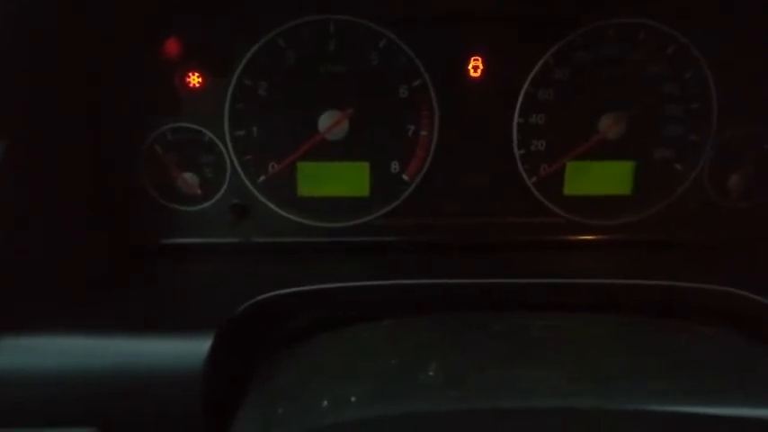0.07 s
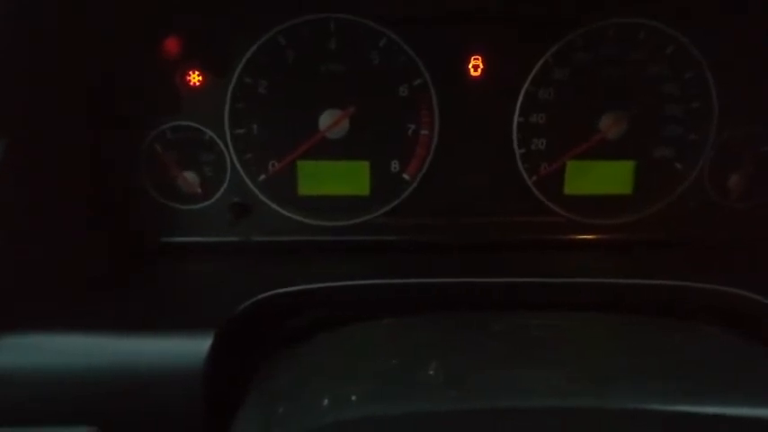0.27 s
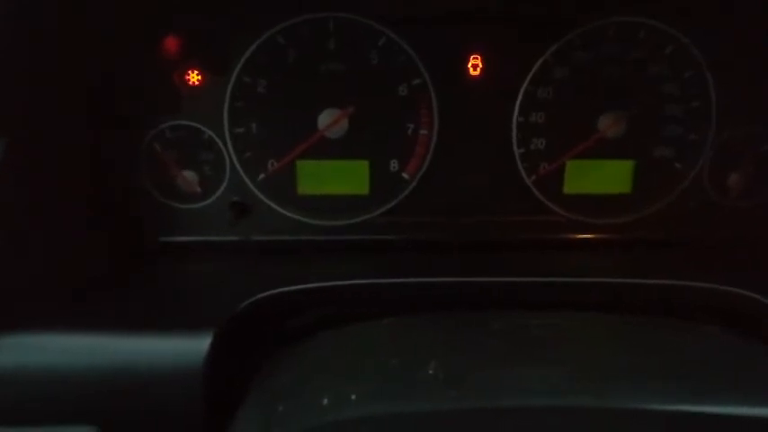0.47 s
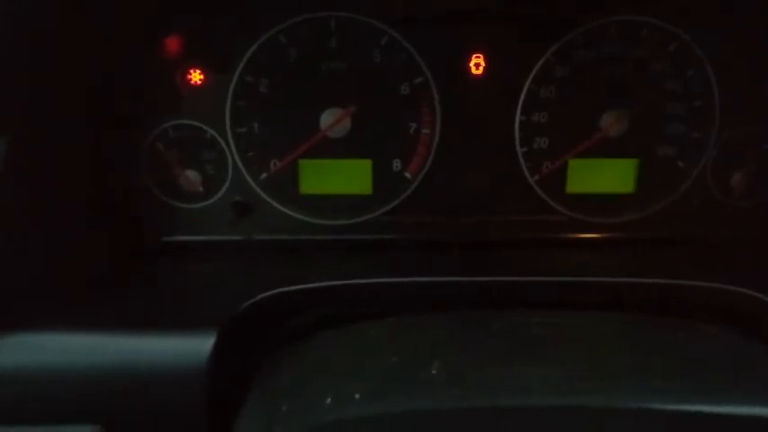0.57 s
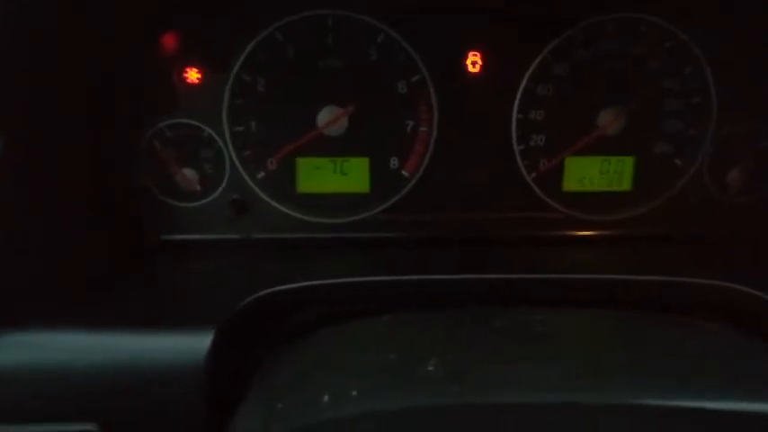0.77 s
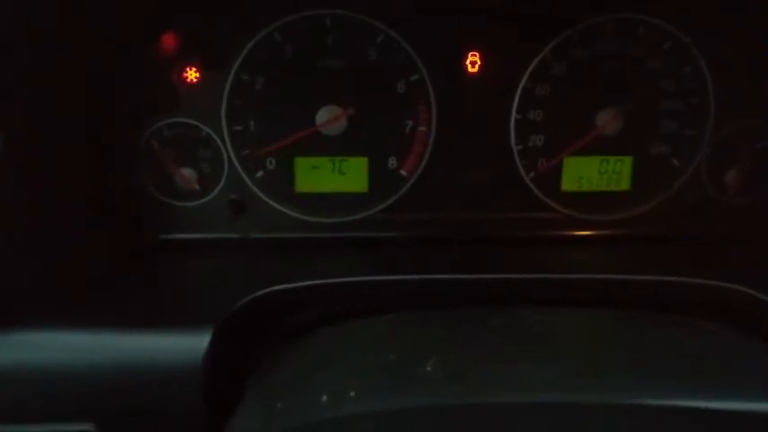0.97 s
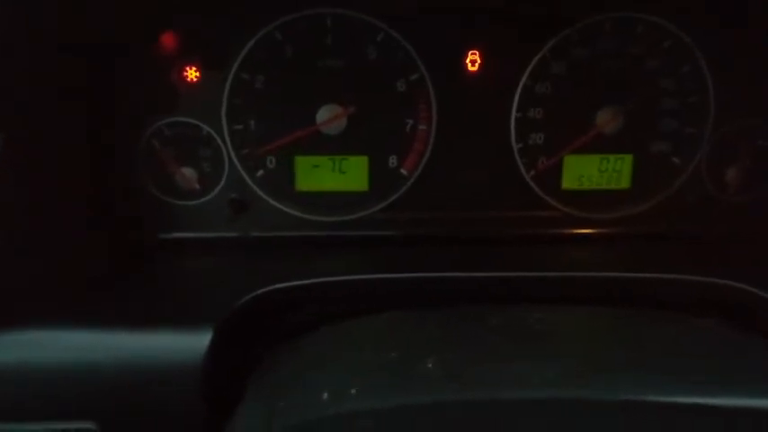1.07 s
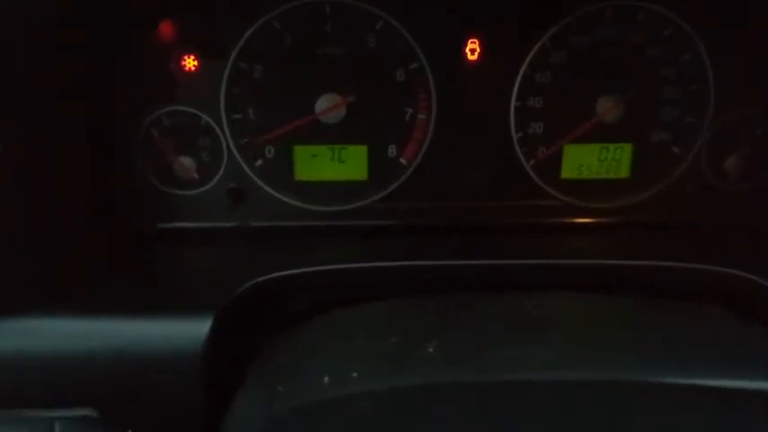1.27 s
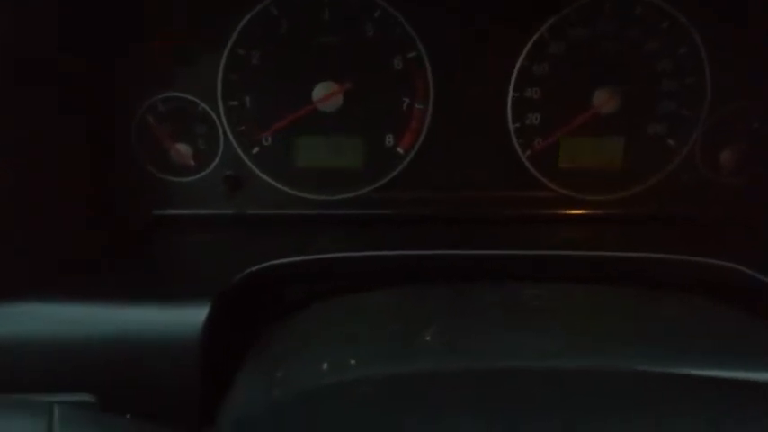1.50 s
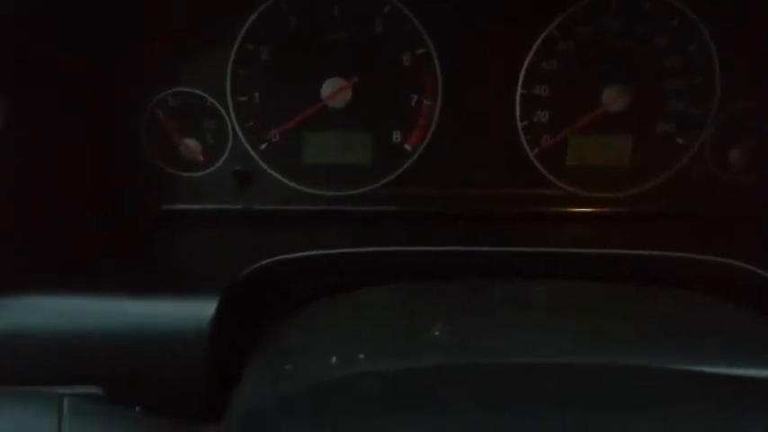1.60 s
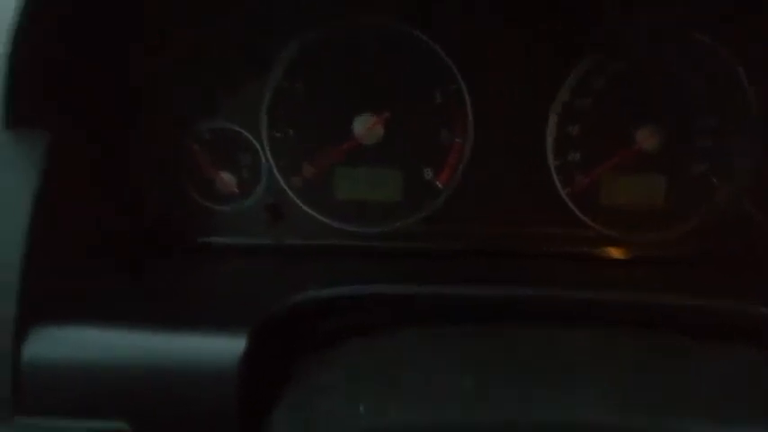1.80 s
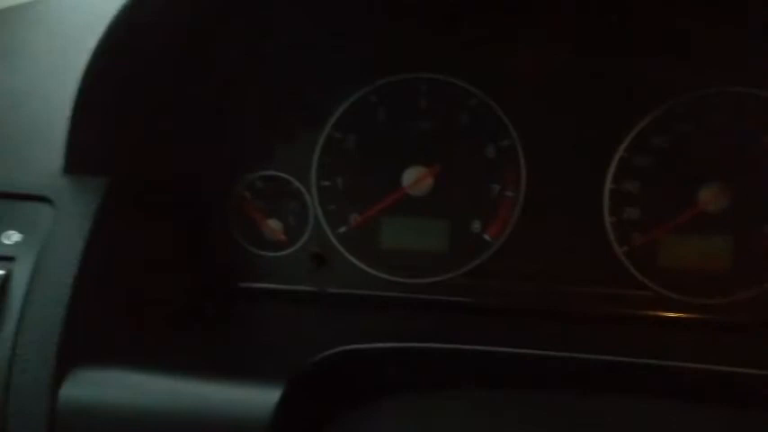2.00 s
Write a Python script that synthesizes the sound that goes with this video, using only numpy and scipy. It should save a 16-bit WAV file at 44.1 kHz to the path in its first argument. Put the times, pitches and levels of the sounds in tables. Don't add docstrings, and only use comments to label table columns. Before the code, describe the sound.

Crisp ignition lock clicks, a short scrape of the key withdrawing, soft plastic knocks in a parked car

```python
import sys
import numpy as np
from scipy import signal
from scipy.fft import rfft, irfft, next_fast_len
from scipy.io import wavfile
from scipy.ndimage import uniform_filter1d, map_coordinates

SR = 44100
rng = np.random.default_rng(int(sys.argv[2]) if len(sys.argv) > 2 else 0)


def attenuation_scalar(level_db):
    decades = np.asarray(level_db, float) / 20
    return 10 ** decades


def output_pcm(signal):
    pcm = np.clip(np.atleast_2d(signal).T, -1, 1) * 32767
    wavfile.write(sys.argv[1], SR, np.round(pcm).astype(np.int16))


N = 90404
FREQ = np.fft.rfftfreq(next_fast_len(N + 8192), 1 / SR)


def unit(x):
    return x / np.sqrt(np.mean(x ** 2) + 1e-20)


def along(points, hz):
    f, v = np.transpose(points)
    return np.interp(np.log(hz + 1), np.log(f + 1), v)


def curves(rows):
    s, *cols = np.transpose(rows)
    return [np.interp(np.arange(N) / SR, s, c) for c in cols]


def wobble(rate):
    knots = rng.standard_normal(int(N * rate / SR) + 4)
    return map_coordinates(knots, [np.arange(N) * rate / SR])


def stroke(start, end, fade):
    t = np.arange(N) / SR
    return np.clip(np.minimum(t - start, end - t) / fade + .5, 0, 1) ** 2


def even(x, seconds):
    power = np.abs(uniform_filter1d(x[0] ** 2, int(seconds * SR)))
    return unit(x / np.sqrt(power + 0.012))


def peaks(table, hz):
    power = 0
    for c, w, db in table:
        power = power + attenuation_scalar(2 * db) * (hz * w) ** 2 / ((c * c - hz * hz) ** 2 + (hz * w) ** 2)
    return np.sqrt(power)


def sides(points, hz):
    return attenuation_scalar(along(points, hz) * np.array([[.5], [-.5]]))


def causal(gain):
    c = irfft(np.log(gain + 1e-6))
    half = c.shape[-1] // 2
    c = np.concatenate([c[..., :1], 2 * c[..., 1:half], np.zeros_like(c[..., half:])], axis=-1)
    return irfft(np.exp(rfft(c)))[..., :half]


# (frequency [Hz], likeness [0-1])
LIKENESS = [(45, 1), (130, 0.98), (290, 0.66), (640, 0)]


def rush(gain, patchy_db):
    z = signal.stft(rng.standard_normal((2, N)), nperseg=512)[2]
    field = uniform_filter1d(uniform_filter1d(rng.standard_normal(z.shape[1:]), 6, 0), 8, 1)
    pair = signal.istft(z * attenuation_scalar(patchy_db * unit(field)), nperseg=512)[1][:, :N]
    turn = np.arccos(np.clip(along(LIKENESS, FREQ), -1, 1)) / 2
    mid, side = rfft(pair, 2 * len(FREQ) - 2) * [np.cos(turn), np.sin(turn)]
    return unit(irfft(np.array([mid + side, mid - side]) * gain)[:, :N])


# (frequency [Hz], time to fall 60 dB [s])
CABIN_DECAY = [(300, 0.15), (1500, 0.072), (5000, 0.052), (14000, 0.039)]


def cabin(wet_db):
    hz, t, z = signal.stft(rng.standard_normal((2, 6144)), SR, nperseg=128)
    decay = attenuation_scalar(-60 * t / along(CABIN_DECAY, hz)[:, None])
    tail = signal.istft(z * decay, SR, nperseg=128)[1]
    build_up = np.clip(np.arange(tail.shape[1]) / (0.0017 * SR), 0, 1)
    tail = attenuation_scalar(wet_db) * tail / np.linalg.norm(tail[0]) * build_up
    tail[:, 0] += 1
    return tail


def contacts(events, modes, broad, side, ring_db, wet_db, spiky_db):
    out = np.zeros((2, N + SR))
    hz, t = np.fft.rfftfreq(8192, 1 / SR), np.arange(2048) / SR
    for s, db, length, tilt_db, aside in events:
        chatter = rng.standard_normal((2, 2048)) * attenuation_scalar(spiky_db * rng.standard_normal(2048))
        chatter = chatter[0] + 0.81 * chatter[1] * np.array([[1], [-1]])
        chatter = chatter * np.exp(-(t / max(length, 3e-4)) ** 4) * (1 - np.exp(-t / 0.00099))
        ring = 1 + attenuation_scalar(ring_db) * peaks(modes, hz)
        colour = attenuation_scalar(along(broad, hz)) * ring * attenuation_scalar(tilt_db * np.log2((hz + 200) / 4000))
        hit = signal.fftconvolve(chatter, causal(colour * sides(side, hz) ** aside), axes=1)
        hit = signal.fftconvolve(hit, cabin(wet_db), axes=1)
        out[:, round(s * SR):][:, :hit.shape[1]] += attenuation_scalar(db) * hit / np.sqrt(np.sum(hit ** 2) / 40)
    return out[:, :N]


def dings(events, cycles, rough=0):
    out, t = np.zeros(N + SR), np.arange(SR // 2) / SR
    for s, db, hz in events:
        slip = uniform_filter1d(uniform_filter1d(rng.standard_normal(len(t)), 120), 120)
        slip = 1 + rough * unit(slip)
        envelope = np.exp(-t * hz / cycles) * (1 - np.exp(-t * hz / 1.06))
        out[round(s * SR):][:len(t)] += attenuation_scalar(db) * slip * np.sin(2 * np.pi * hz * t) * envelope
    return out[:N]


# (frequency [Hz], level [dB])
HISS_COLOUR = [(200, -48), (300, 20.5), (700, 9.5), (2500, 7), (6000, 7), (15600, -39)]


def hiss():
    return attenuation_scalar(-75) * rush(attenuation_scalar(along(HISS_COLOUR, FREQ)), patchy_db=4.5)


# (pitch [Hz], level [dB], start [s], end [s])
WHINE_TONES = [
    (920, -74, 0.75, 1.08),
    (870, -78.5, 0.87, 1.1),
    (498, -80, .75, 1.11),
    (14500, -80, 0.23, 0.22),
]


def whines():
    t, out = np.arange(N) / SR, 0
    for hz, db, start, end in WHINE_TONES:
        out = out + attenuation_scalar(db + 2.4 * wobble(23)) * stroke(start, end, 0.038) * np.sin(2 * np.pi * hz * t)
    return out


# (time [s], level [dB])
AIR_FLOW = [(0, -54), (.09, -53), (.125, -65), (.16, -56.5), (.38, -53.5), (.47, -60), (1.1, -74),
            (1.6, -71.5)]
# (frequency [Hz], width [Hz], level [dB])
DUCT_TONES = [(262, 83, 3.5), (822, 206, -3), (1125, 147, -1), (1617, 110, -6.5), (2390, 90, -7.5),
              (3250, 1100, -9)]


def fan():
    flow_db, = curves(AIR_FLOW)
    ducts = (peaks(DUCT_TONES, FREQ) / (1 + (FREQ / 4300) ** 4)) ** 1.5
    air = rush(ducts * attenuation_scalar([[1.5], [-1.5]]), patchy_db=1.5)
    return attenuation_scalar(flow_db + 0.16 * wobble(29)) * air


# (time [s], pitch [Hz], level [dB])
BOOM_PATH = [(.9, 58.5, -60.5), (1.03, 59.65, -44.5), (1.11, 60, -55), (1.21, 58.5, -45.5),
             (1.3, 60.2, -58), (1.37, 59.7, -41), (1.42, 61.54, -54), (1.53, 62.26, -40.5),
             (1.62, 67.1, -44.5), (1.72, 64.6, -35.5), (1.85, 65.3, -51.5), (2.01, 64.6, -43)]


def boom():
    hz, boom_db = curves(BOOM_PATH)
    phase = 2 * np.pi * np.cumsum(hz + .5 * wobble(10.5)) / SR
    return np.sqrt(2) * attenuation_scalar(boom_db) * np.sin(phase)


# (time [s], seat level [dB], hand level [dB])
MOVEMENT = [(0.0, -51, -49.5), (0.19, -46, -40), (0.22, -47.5, -41.5), (0.38, -49, -48.5),
            (0.42, -48.5, -38.5), (0.46, -43.5, -44), (0.59, -47.5, -34.5), (0.62, -39, -36),
            (0.67, -38, -39.5), (0.72, -38.5, -40.5), (0.93, -53.5, -39.5), (1.02, -57.5, -48.5),
            (1.05, -54, -40), (1.1, -60, -52), (1.28, -47, -49), (1.42, -59.5, -49), (1.79, -56, -58),
            (2.0, -63, -63)]
# (frequency [Hz], level [dB])
SEAT_COLOUR = [(50, -8.5), (80, 1), (150, 0), (230, -14.5), (500, -49.5)]
# (frequency [Hz], level [dB])
HAND_COLOUR = [(10, 2.5), (25, 12.5), (45, 6.5), (70, 7), (90, -47)]


def body():
    seat_db, hand_db = curves(MOVEMENT)
    seat = even(rush(attenuation_scalar(along(SEAT_COLOUR, FREQ)), patchy_db=-1.0), 0.0348)
    hand = even(rush(attenuation_scalar(along(HAND_COLOUR, FREQ)), patchy_db=-1.1), 0.064)
    return attenuation_scalar(seat_db + 1.2 * wobble(29.89)) * seat + attenuation_scalar(hand_db) * hand


# (time [s], level [dB])
SLEEVE_EFFORT = [(.5, -80), (.58, -65), (.66, -59), (.82, -62.5), (.86, -69), (1.0, -69.5), (1.05, -58.5),
                 (1.17, -56), (1.21, -62), (1.6, -67), (1.68, -65), (1.8, -60), (2.05, -63)]
# (frequency [Hz], level [dB])
CLOTH_COLOUR = [(3800, -24), (4700, -24), (5300, -4.5), (6500, -11.5), (9000, -10.5), (11000, -14.5),
                (13000, -16), (15600, -20)]
# (frequency [Hz], left over right [dB])
CLOTH_SIDE = [(1000, 21.5), (4000, 20), (8000, -11.5), (14000, -18)]


def sleeve():
    effort_db, = curves(SLEEVE_EFFORT)
    cloth = rush(attenuation_scalar(along(CLOTH_COLOUR, FREQ)) * sides(CLOTH_SIDE, FREQ), patchy_db=1.5)
    return attenuation_scalar(effort_db + 2.7 * wobble(29.6)) * cloth


# (time [s], level [dB], pitch [Hz])
HAND_BUMPS = [(.655, -24, 21.2), (.673, -18, 104), (.718, -41, 128), (.755, -45, 110), (.845, -33, 24),
              (1.24, -36, 237), (1.255, -30, 208), (1.263, -30.5, 297), (1.271, -36, 193),
              (1.283, -40.5, 345), (1.355, -40, 154), (1.8, -39.5, 254)]


def thumps():
    return dings(HAND_BUMPS, cycles=1.3)


# (time [s], level [dB], pitch [Hz])
TRIM_CREAKS = [(.279, -43.5, 870), (.541, -40, 1200), (.636, -43, 1660), (.712, -47, 1670),
               (.714, -56, 824), (.753, -59, 1235), (.795, -54, 1700), (.812, -61, 1710), (.896, -55, 1200),
               (1.052, -54.5, 670), (1.054, -49.5, 1170), (1.06, -51, 2250), (1.242, -41.5, 615),
               (1.278, -25, 1360), (1.357, -46.5, 647), (1.464, -34.5, 836), (1.52, -41, 556)]


def creaks():
    return dings(TRIM_CREAKS, cycles=5.1, rough=.5) * attenuation_scalar([[2.5], [-2.5]])


# (time [s], level [dB], pitch [Hz])
RING_TICKS = [
    (1.866, -31, 4800),
    (1.8856, -32, 3400),
    (1.8856, -35, 1400),
    (2.045, -39, 4240),
]


def nicks():
    return dings(RING_TICKS, cycles=1.1) * attenuation_scalar([[3.5], [-3.5]])


# (start [s], end [s], level [dB], pitch [Hz], width over pitch)
FINGER_SCUFFS = [
    (0.608, 0.786, -65.5, 472, 0.53),
    (0.253, 0.343, -63, 2960, 0.44),
    (1.066, 1.186, -64, 1200, 0.74),
    (1.365, 1.463, -58.5, 3650, 0.021),
    (1.45, 1.579, -50.5, 617, 0.42),
    (1.723, 1.929, -65, 1670, 0.7),
    (1.741, 2.197, -63.5, 5240, 0.63),
]


def scuffs():
    out = 0
    for start, end, db, hz, width in FINGER_SCUFFS:
        skin = rush(peaks([(hz, width * hz, 0)], FREQ) ** 2, patchy_db=3.5)
        out = out + attenuation_scalar(db + 0.74 * wobble(120)) * stroke(start, end, 0.065) * skin
    return out * attenuation_scalar([[2.5], [-2.5]])


# (time [s], level [dB], chatter length [s], tilt [dB per octave])
COLUMN_KNOCKS = [(1.135, -23.5, 0.0074, -1.5), (1.146, -26.5, 0.0048, -4), (1.166, -32, 0.0084, -7.5),
                 (1.237, -31, 0.018, 0.5), (1.2746, -17, 0.003, 2.5), (1.281, -23.5, 0.0019, 1),
                 (1.317, -35, 0.0093, -8), (1.356, -29, 0.0059, 4), (1.478, -31, 0.0049, -3),
                 (1.515, -30.5, 0.01, -1), (1.555, -31, .0015, 1.5)]
# (frequency [Hz], width [Hz], level [dB])
COLUMN_MODES = [(870, 29, -4.5), (1322, 127, -2.5), (2250, 110, -6), (3546, 140, -4), (4730, 290, -6.5)]
# (frequency [Hz], level [dB])
COLUMN_COLOUR = [(250, -28.5), (800, -18), (6000, -23.5), (8500, -27.5), (15500, -49)]
# (frequency [Hz], left over right [dB])
COLUMN_PLACE = [(500, 2), (1500, 5), (5000, 5.5), (10000, -9.5)]


def column():
    knocks = [(*row, 1) for row in COLUMN_KNOCKS]
    return contacts(knocks, COLUMN_MODES, COLUMN_COLOUR, COLUMN_PLACE, ring_db=15.0, wet_db=1.5, spiky_db=7)


# (time [s], level [dB], pitch [Hz])
SHELL_CLACKS = [
    (.499, -30.5, 1400),
    (.512, -36, 870),
    (.551, -23.5, 1286),
    (.554, -33, 2520),
    (.557, -30, 1087),
    (1.257, -28, 2210),
    (1.557, -39, 1570),
    (1.557, -37, 2380),
]


def clacks():
    return dings(SHELL_CLACKS, cycles=3.5, rough=.5) * attenuation_scalar([[2.5], [-2.5]])


# (time [s], level [dB])
DRAW_EFFORT = [(1.2, -55.5), (1.29, -49.5), (1.37, -48.5), (1.42, -51), (1.49, -46), (1.56, -49.5),
               (1.59, -54), (1.61, -67), (1.64, -71)]
# (frequency [Hz], level [dB])
BLADE_COLOUR = [(400, -14.5), (900, -10.5), (4500, -3), (9000, -6.5), (15600, -13)]
# (frequency [Hz], left over right [dB])
LOCK_PLACE = [(600, -2.5), (1500, 9.5), (2800, -1.5), (5500, 5), (7300, -6.5), (8800, -16), (14000, -13)]


def blade():
    effort_db, = curves(DRAW_EFFORT)
    drag = rush(attenuation_scalar(along(BLADE_COLOUR, FREQ)) * sides(LOCK_PLACE, FREQ) ** 0.59, patchy_db=1.0)
    flutter_db = .8 * wobble(59.9) + 0.51 * wobble(270)
    return attenuation_scalar(effort_db + flutter_db) * stroke(1.2, 1.66, 0.059) * drag


# (time [s], level [dB], chatter length [s], tilt [dB per octave], how far right [0-1])
DETENT_SNAPS = [(.4985, -20, 0.0057, -5, 1), (.5063, -14.5, 0.0026, -3, 1), (.5098, -12.5, 0.0017, 1, 0.53),
                (.5145, -16.5, .004, 1, 0.8), (.5492, -25, 0.001, -3, 0.5), (.5511, -7, 0.0018, -3, 0.74),
                (.5545, -11.5, 0.0014, -2, 0.65), (1.047, -39.5, 0.0067, -5.5, 1),
                (1.2563, -10.5, 0.0028, -1, 0.57), (1.2603, -14, .0015, 1, 1),
                (1.264, -23, 0.0018, -4.5, 1), (1.4367, -19, 0.0061, -2, 0.57),
                (1.4623, -11, 0.0029, -1, 1)]
# (frequency [Hz], width [Hz], level [dB])
LOCK_MODES = [(1200, 300, -20), (2620, 190, -9), (3830, 140, -10.5), (5340, 150, -12.5), (7100, 310, -11.5),
              (8400, 190, -17), (13530, 710, -7)]
# (frequency [Hz], level [dB])
LOCK_COLOUR = [(400, -29.5), (800, -22.5), (1150, -12), (2600, -8.5), (5600, 2.5), (15500, -8)]


def lock():
    return contacts(DETENT_SNAPS, LOCK_MODES, LOCK_COLOUR, LOCK_PLACE, ring_db=12.0, wet_db=-.8, spiky_db=3.5)


def scene():
    background = hiss() + whines() + fan() + boom()
    person = body() + sleeve() + thumps() + scuffs()
    plastic = creaks() + column() + clacks()
    return background + person + plastic + nicks() + blade() + lock()


def band_limit(x):
    return signal.sosfilt(signal.butter(12, 16680, fs=SR, output="sos"), x)


def record(dry):
    top_hz, edge_hz = 15900, 120
    edge = attenuation_scalar(-30 * np.clip((FREQ - top_hz) / edge_hz, 0, None) ** .4)
    mix = irfft(rfft(dry, 2 * len(FREQ) - 2) * edge)[:, :N]
    return band_limit(mix)


dry = scene()
out = record(dry)
output_pcm(out)
```